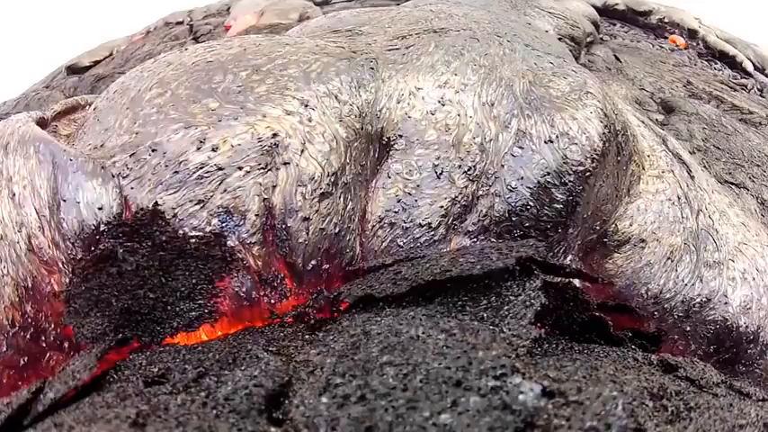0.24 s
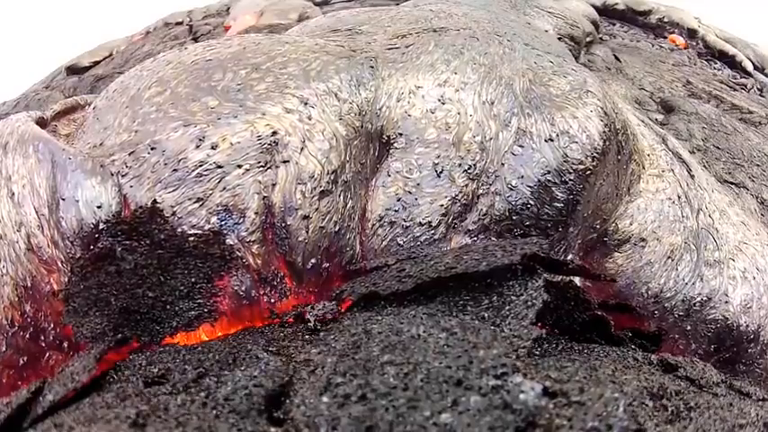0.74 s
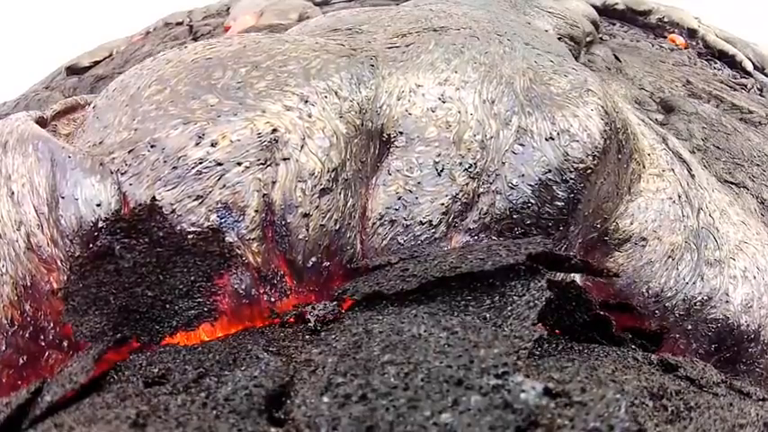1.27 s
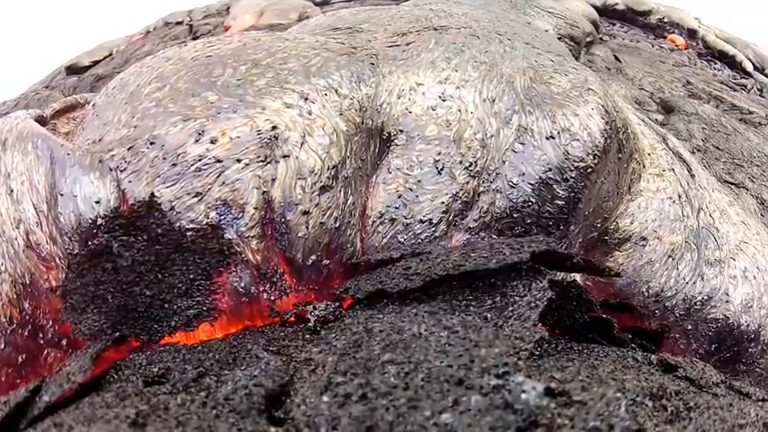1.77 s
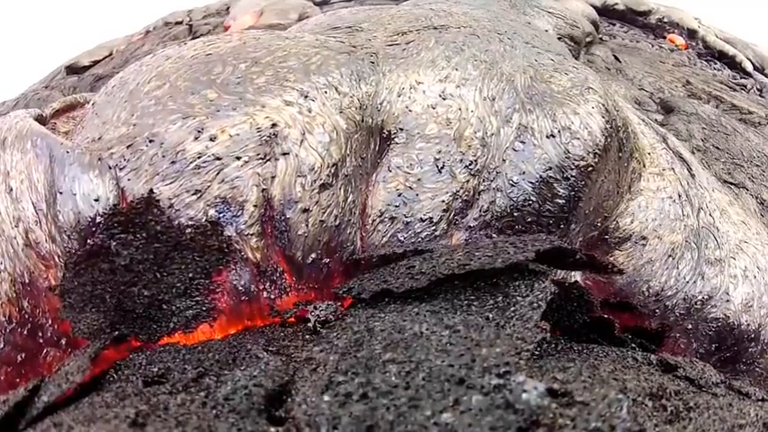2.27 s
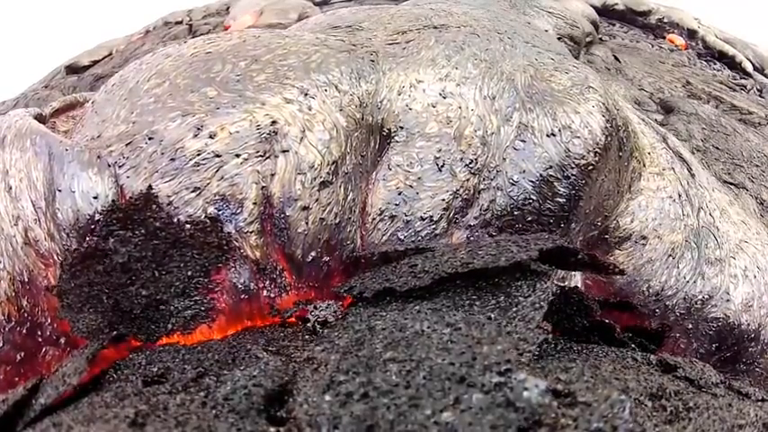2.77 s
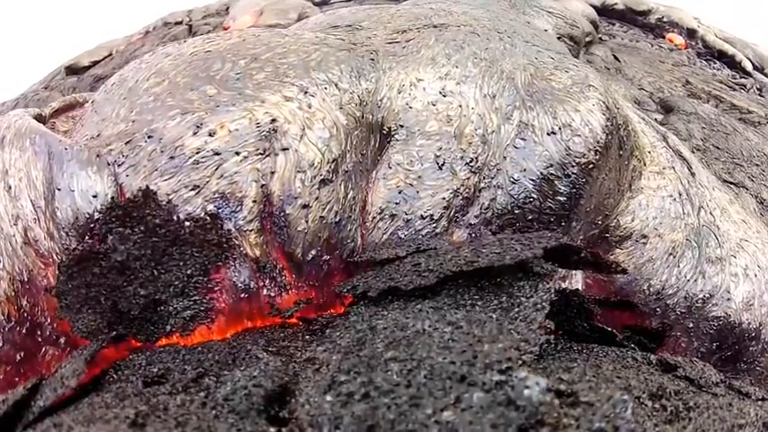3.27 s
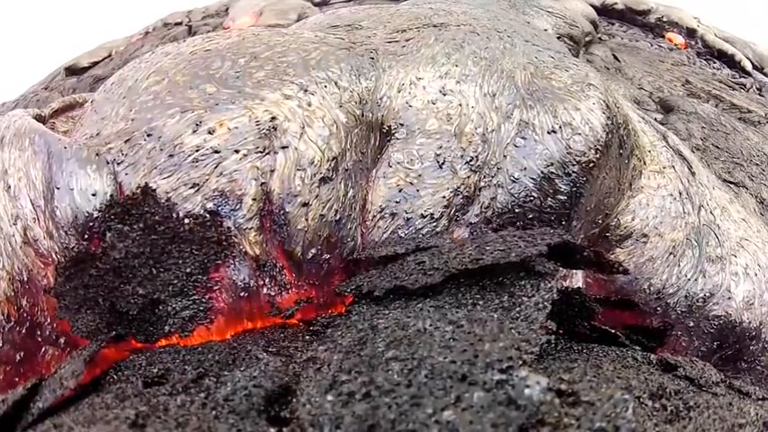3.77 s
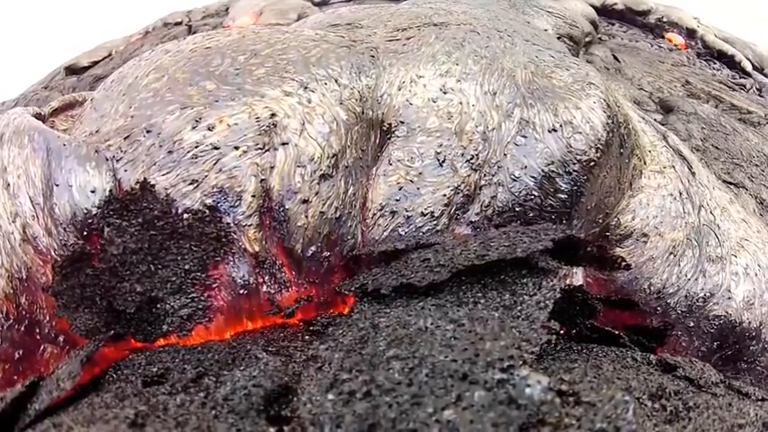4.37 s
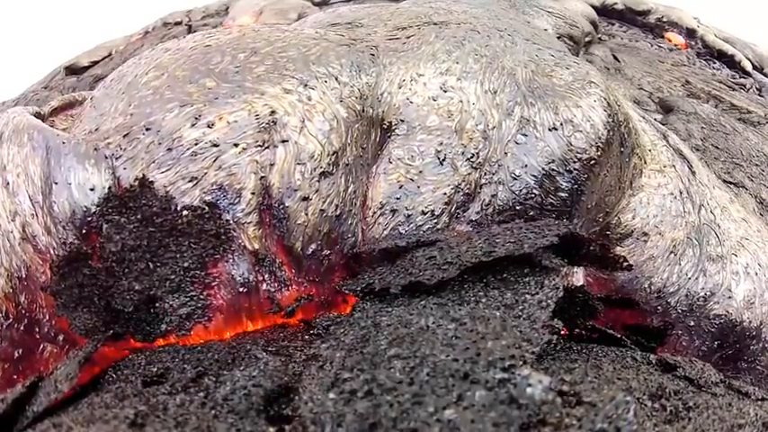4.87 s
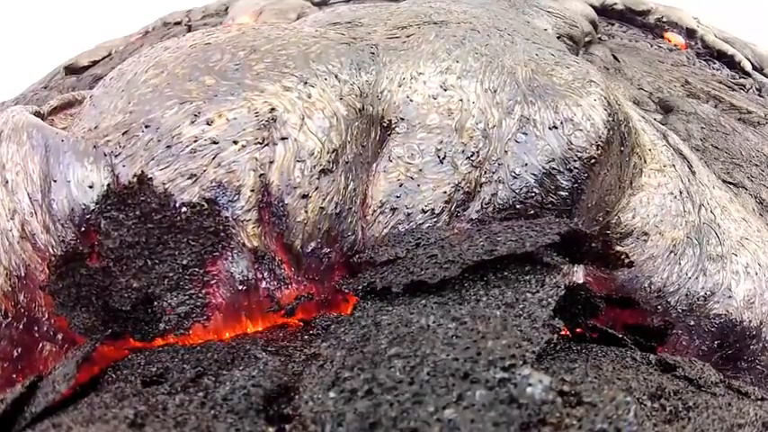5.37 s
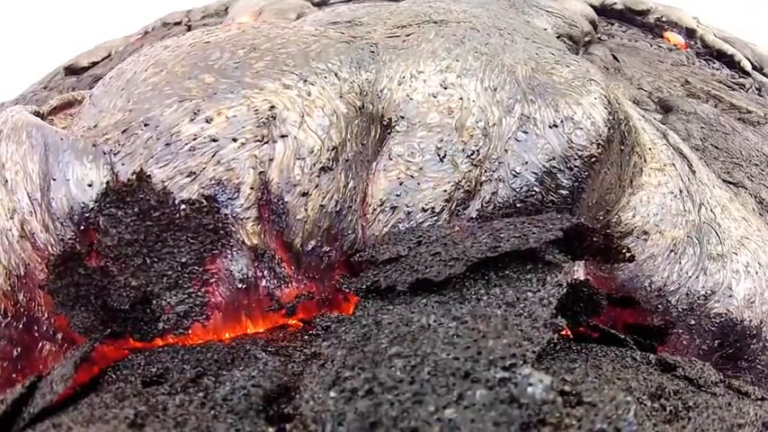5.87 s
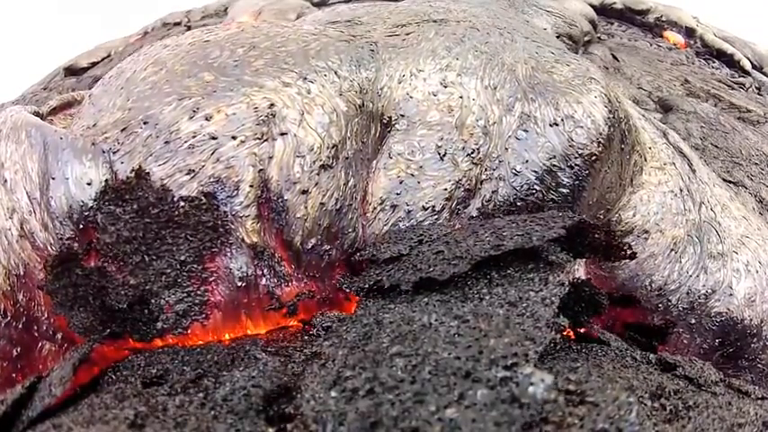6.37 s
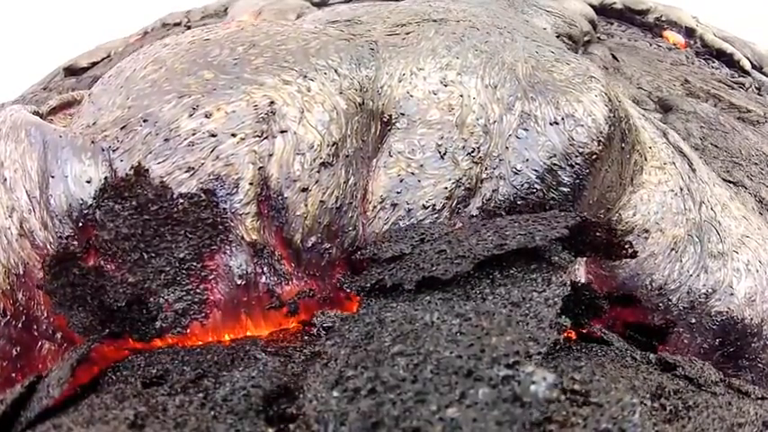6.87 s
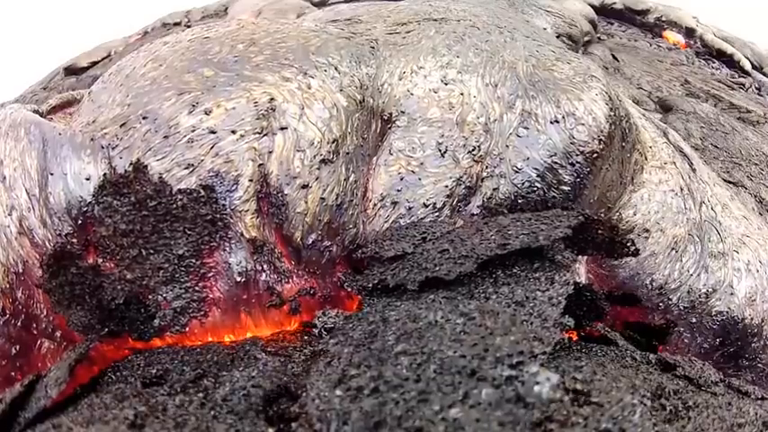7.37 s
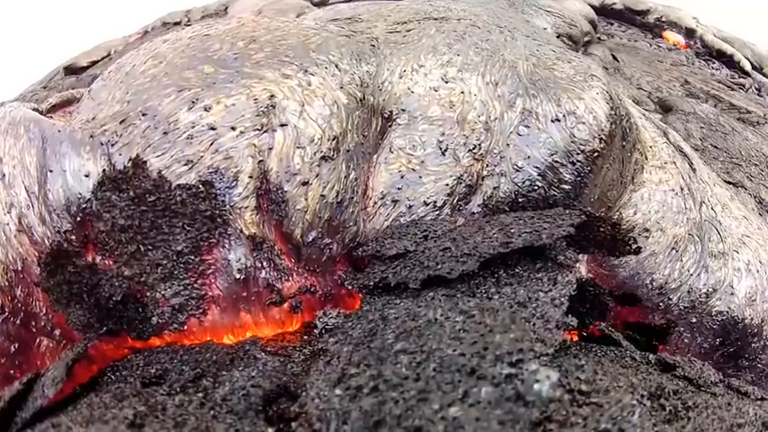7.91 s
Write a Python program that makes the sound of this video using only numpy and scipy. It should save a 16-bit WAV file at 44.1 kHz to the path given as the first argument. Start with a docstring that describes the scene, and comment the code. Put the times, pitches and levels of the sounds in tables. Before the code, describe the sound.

Close by in the open air, creeping lava breaks its cooling crust in small, uneven, hollow crunches. Glassy flakes tick off over a fine gritty crackle, and wind rumbles in swells on the microphone. A plate of crust snaps early, another cracks loudest near the middle, and two smaller snaps follow. Near the end the wind drops while the crunching goes on.

```python
"""A lobe of lava pushes against its cooling crust, close by in the open air. From the start the crust gives way
in small crunches and glassy flakes tick off, while wind rumbles in swells on the microphone. A plate snaps at
1.6 s, another, the loudest, at 3.5 s, and two more at 5.6 and 6.0 s. After 7 s the wind drops and the crunching
goes on. Throughout, each sample is held at a low rate, which mirrors the crackle into a gritty treble."""
import sys
import numpy as np
from scipy import signal
from scipy.fft import rfft, irfft, next_fast_len
from scipy.io import wavfile
from scipy.ndimage import uniform_filter1d

SR = 44100
rng = np.random.default_rng(int(sys.argv[2]) if len(sys.argv) > 2 else 0)


def dump(signal):
    """Clip the signal to [-1, 1] and save it as 16-bit WAV at the path in sys.argv[1]."""
    limited = np.clip(np.atleast_2d(signal).T, -1, 1)
    pcm = np.round(limited * 32767).astype(np.int16)
    wavfile.write(sys.argv[1], SR, pcm)


N = 358974
TIME = np.arange(N) / SR

# spectra of outdoor hush, wind rumble and recorder hiss: (frequency [Hz], relative density [dB])
AIR_SPECTRUM = [(30, -7), (100, 7.5), (230, 1), (400, 4), (800, 7), (1100, -14), (1600, -11.5), (2400, -10),
                (3400, -14.5), (4200, -15.5), (5000, -17.5), (6000, -25)]
RUMBLE_SPECTRUM = [(15, -19), (28, -2.5), (48, 1), (75, -1), (120, -5.5), (180, -10.5), (260, -19.5),
                   (400, -27), (800, -56.5), (2000, -63.5)]
HISS_SPECTRUM = [(30, 13.5), (100, -4.5), (250, 15.5), (420, 0.5), (750, -29), (1100, -12), (2000, -10),
                 (5000, 3.5), (7500, -5.5), (10000, -32), (16000, -57)]
# slow swell of the breeze: (time [s], relative level [dB])
BREEZE_SWELL = [(0.0, -46), (0.65, -56.5), (0.95, -47), (1.2, -47.5), (1.7, -44), (1.92, -51.5),
                (2.55, -49), (2.95, -53), (3.2, -50.5), (3.7, -53.5), (4.1, -52.5), (4.3, -45.5),
                (4.65, -50.5), (5.45, -48.5), (5.74, -42), (5.97, -49), (6.6, -48.5), (7.35, -58),
                (8.14, -56.5)]
# single buffets on the microphone: (time of peak [s], relative level [dB])
WIND_BUFFETS = [(0.16, -44.5), (1.27, -40.5), (1.48, -42), (1.8, -39.5), (2.049, -38.5), (2.35, -40),
                (2.71, -45.5), (3.17, -47), (4.43, -40.5), (4.96, -41.5), (5.79, -40.5), (6.11, -43.5),
                (6.22, -45.5), (6.5, -44)]
# fine crackle of the creeping crust: (time [s], level [dB])
CREEP_LEVEL = [(0.0, -52), (0.88, -54), (1.81, -52), (2.97, -56), (3.22, -53), (4.65, -57.5), (5.46, -52.5),
               (5.94, -55.5), (7.75, -52), (8.14, -56.5)]
# modes of flakes, hollow slab and brittle edges: (frequency [Hz], bandwidth [Hz], relative gain [dB])
FLAKE_RESONANCES = [(2510, 1020, -8), (4000, 1210, -7)]
BODY_RESONANCES = [(262.4, 150, -3.5), (506.5, 112, -0.5), (627.7, 122, -1), (777, 133, 0.5),
                   (873, 89, -4.5)]
EDGE_RESONANCES = [(1323, 132, 1), (1788, 123, 0.2), (2136, 243, 0.5), (2282, 114, -3), (2676, 210, -3.5),
                   (3020, 270, -3.5), (3973, 320, -5.5)]
# the louder flakes springing off: (time [s], relative level [dB])
FLAKE_TICKS = [(0.0183, -57), (0.2874, -60), (0.7793, -53), (0.8912, -57.5), (1.1771, -59.5), (1.5724, -65),
               (1.638, -54.5), (2.3975, -62), (2.4727, -51.5), (3.0589, -59), (3.1211, -58), (3.2282, -50),
               (3.3688, -57.5), (3.556, -61), (3.5684, -61), (3.933, -55.5), (3.97, -63), (4.0078, -61.5),
               (4.252, -55.5), (5.2165, -54.5), (5.8368, -56), (5.878, -57), (6.5583, -64), (6.9503, -63),
               (7.8375, -57.5)]
# plates breaking: (time [s], thump level before low-pass [dB], thump frequency [Hz],
# crack level [dB], crack frequency [Hz], click level [dB])
PLATE_SNAPS = [(1.6245, -32.5, 393, -30.5, 1540, -47), (3.5456, -12, 388, -13.5, 1960, -10),
               (5.5620, -38, 500, -30.5, 2330, -38.5), (6.0080, -24, 304, -45, 2100, -66)]
# the louder crunches: (time [s], nominal length [s], body level [dB], body pitch [Hz],
# edge level [dB], edge pitch [Hz])
LOUD_CRUNCHES = [(0.014, 0.019, -46, 745, -50.5, 2030), (0.202, 0.0072, -38, 880, -51, 2100),
                 (0.245, 0.016, -43, 660, -55, 1390), (0.356, 0.0027, -36.5, 660, -39.5, 2130),
                 (0.518, 0.016, -42, 754, -57, 1600), (0.608, 0.0066, -45.5, 726, -54, 2300),
                 (0.744, 0.014, -40, 834, -54.5, 2240), (0.846, .018, -43.5, 790, -54, 1900),
                 (1.02, 0.0069, -53, 715, -54.5, 1590), (1.101, 0.0064, -46, 670, -60, 1590),
                 (1.336, 0.0069, -44.5, 810, -52.5, 2100), (1.367, .012, -46, 760, -64, 2000),
                 (1.456, 0.0062, -42.5, 804, -45.5, 1890), (1.574, 0.0099, -43, 760, -57, 1700),
                 (1.638, .005, -45, 790, -50.5, 1790), (1.743, 0.0023, -39.5, 546, -65, 1800),
                 (1.823, 0.069, -50, 640, -56.5, 2200), (1.916, .005, -43.5, 774, -56, 1800),
                 (2.129, 0.0013, -39, 680, -50.5, 1690), (2.18, 0.016, -46.5, 780, -50, 2130),
                 (2.245, 0.013, -36, 695, -47, 2160), (2.292, 0.01, -38, 756, -54, 2100),
                 (2.456, 0.01, -46.5, 706, -55, 2700), (2.705, 0.0025, -38.5, 790, -58, 2000),
                 (2.799, 0.0069, -41.5, 780, -48, 1400), (3.018, 0.048, -46, 770, -55, 2520),
                 (3.36, 0.022, -45.5, 700, -55, 1810), (3.393, 0.0057, -41, 570, -53, 2000),
                 (3.747, 0.0079, -46.5, 770, -56, 2800), (3.841, 0.016, -46.5, 760, -61, 1500),
                 (3.908, 0.0071, -42.5, 810, -40.5, 2760), (4.183, 0.02, -47.5, 640, -57.5, 2100),
                 (4.574, 0.0049, -45, 676, -51.5, 2150), (4.831, .011, -48, 730, -64, 1700),
                 (5.255, .02, -46.5, 680, -63, 1800), (5.402, 0.007, -48, 770, -72, 2300),
                 (5.861, 0.019, -36, 675, -47, 1680), (6.058, 0.005, -41.5, 760, -66, 1500),
                 (6.076, .022, -44.5, 567, -61, 2200), (6.212, .01, -47.5, 700, -53, 2320),
                 (6.269, 0.0098, -41, 660, -53, 2570), (6.339, 0.026, -45.5, 537, -53, 2090),
                 (6.4, 0.0035, -43, 746, -63, 2200), (6.608, .011, -48, 730, -50.5, 3260),
                 (6.723, 0.0025, -45.5, 610, -52, 1900), (6.76, 0.021, -41.5, 790, -56, 2200),
                 (7.116, .003, -36, 715, -53, 1700), (7.15, 0.012, -47, 770, -49, 2800),
                 (7.193, 0.0054, -40.5, 680, -46.5, 1770), (7.284, .005, -42, 800, -57, 1500),
                 (7.313, .003, -44, 820, -51, 1800), (7.33, .011, -45, 650, -58, 2000),
                 (7.467, 0.013, -41, 604, -54, 1970), (7.624, 0.016, -44, 505, -62, 2200),
                 (7.745, 0.032, -42.5, 540, -57.5, 2100), (7.981, 0.003, -38, 746, -50, 3400),
                 (8.047, 0.022, -39.5, 720, -50.5, 1990)]


def from_db(db):
    """Amplitude grows tenfold for every 20 dB."""
    return 10 ** (np.asarray(db) / 20)


def unit_rms(x):
    """Normalisation to rms 1."""
    return x / np.sqrt(np.mean(x ** 2) + 1e-20)


def unit_peak(x):
    """Normalisation to peak 1."""
    return x / (np.abs(x).max() + 1e-20)


def unit_burst(x):
    """Normalisation to rms 1 over the loudest 10 ms."""
    return x / np.sqrt(uniform_filter1d(x ** 2, 440).max() + 1e-20)


def curve(rows, times=TIME):
    """Linear interpolation between (time, value) rows."""
    return np.interp(times, *np.transpose(rows))


def drift(per_s):
    """Random modulation: straight lines join per_s standard normal values a second."""
    return np.interp(TIME * per_s, np.arange(4000), rng.standard_normal(4000))


def noise(spectrum):
    """Spectral shaping colours white noise; the result has rms 1."""
    hz, db = np.transpose(spectrum)
    size = next_fast_len(N, real=True)
    bin_hz = np.arange(size // 2 + 1) * SR / size
    gain = from_db(np.interp(np.log(bin_hz + 1e-3), np.log(hz), db))
    return unit_rms(irfft(rfft(rng.standard_normal(size)) * gain, size)[:N])


def add(out, start_s, sound):
    """Superposition: a sound adds to the mix from start_s on."""
    at = int(np.clip(round(start_s * SR), 0, N - 1))
    out[at:at + len(sound)] += sound[:N - at]


def resonate(x, hz, width_hz):
    """A resonator passes a steep-sided band around its natural frequency."""
    low = np.hypot(hz, width_hz / 2) - width_hz / 2
    band = [low, min(low + width_hz, SR / 2 - 1)]
    return signal.sosfilt(signal.butter(2, band, "band", fs=SR, output="sos"), x + 1e-18)


def pop(hz, width_hz):
    """Impulse response of one resonance, with peak 1."""
    return unit_peak(resonate(signal.unit_impulse(1500), hz, width_hz))


def strike(clicks, modes, vary_db, weight=lambda hz: 1):
    """Modal excitation: every click drives each mode with a random strength of its own."""
    out, hit = 0, clicks != 0
    for hz, width_hz, db in modes:
        force = clicks * weight(hz)
        force[hit] *= from_db(db + vary_db * rng.standard_normal(hit.sum()))
        out = out + resonate(force, hz, width_hz)
    return out


def outdoor_hush(level_db=-58):
    """Stationary noise forms the ambient floor of the open air."""
    return from_db(level_db) * noise(AIR_SPECTRUM)


def wind(gain_db=1.08, calm_db=-58, flutter_db=1.9, buffet_s=0.029):
    """Turbulence rumbles on the microphone; the fluttering breeze and brief buffets add in power."""
    eddies = noise(RUMBLE_SPECTRUM)
    even_rumble = eddies / np.sqrt(uniform_filter1d(eddies ** 2, 5000))
    power = from_db(curve(BREEZE_SWELL) + flutter_db * drift(per_s=14)) ** 2
    for peak_s, db in WIND_BUFFETS:
        power += from_db(db) ** 2 * np.exp(-((TIME - peak_s) / buffet_s) ** 2)
    gust = from_db(gain_db) * np.sqrt(power)
    calm_fade = gust ** 2 / (gust ** 2 + from_db(calm_db) ** 2)   # in a calm the eddies die out
    return gust * even_rumble * calm_fade


def frying_skin(level_db=-72, per_s=240, size_db=7):
    """Shot noise: specks of glassy skin spring off the cooling lobe at independent instants."""
    released = rng.random(N) < per_s / SR
    size = np.minimum(rng.exponential(1, N), 3)
    clicks = released * rng.choice([-1, 1], N) * from_db(size_db * size)
    return from_db(level_db) * unit_rms(strike(clicks, FLAKE_RESONANCES, vary_db=1.5))


def creep_crackle(per_s=900, clump_db=5.5, size_db=5.0, body_db=-0.13, edge_db=-11):
    """Acoustic emission: tiny fractures come in clumps and excite the modes of the creeping crust."""
    fractures = rng.random(N) < per_s / SR
    clumping_db = clump_db * np.minimum(drift(per_s=85), 1)
    polarity = rng.choice([-1, 1], N)
    size = np.minimum(rng.exponential(1, N), 2)
    clicks = fractures * polarity * from_db(size_db * size + clumping_db)
    body = from_db(body_db) * unit_rms(strike(clicks, BODY_RESONANCES, vary_db=3.5))
    edge = from_db(edge_db) * unit_rms(strike(clicks, EDGE_RESONANCES, vary_db=3.0))
    return from_db(curve(CREEP_LEVEL)) * (body + edge)


def flake_ticks(gain_db=17.0, pitch_spread=0.14):
    """Damped free vibration: each thin flake rings for about a millisecond at a pitch of its own."""
    out = np.zeros(N)
    tunings = np.exp(pitch_spread * rng.standard_normal(len(FLAKE_TICKS)))
    for (start_s, db), tuning in zip(FLAKE_TICKS, tunings):
        flake = sum(from_db(mode_db) * pop(hz * tuning, width) for hz, width, mode_db in FLAKE_RESONANCES)
        add(out, start_s, from_db(db + gain_db) * unit_peak(flake))
    return out


def slip_runs(lengths_s, per_s, first_slip, samples=3600):
    """Power-law relaxation: a first fracture sets off a dying run of small slips, one row per length."""
    shape = (len(lengths_s), samples)
    age_s = np.arange(samples) / SR
    slips = rng.standard_normal(shape) * (rng.random(shape) < per_s / SR)
    slips[:, 0] = first_slip
    return slips / (1 + (age_s / np.maximum(lengths_s, .001)[:, None]) ** 2) ** 2


def plate_snaps(splinter_db=-16, grit_db=-20, grit_s=0.011):
    """Impulsive radiation: a breaking plate shoves the air, with a crack and glassy click; grit follows."""
    out = np.zeros(N)
    click = pop(hz=4150, width_hz=720) + from_db(splinter_db) * pop(hz=5500, width_hz=800)
    lowpass = signal.butter(2, 950, fs=SR, output="sos")
    slips = slip_runs(np.full(len(PLATE_SNAPS), grit_s), per_s=3400, first_slip=1)
    grits = strike(slips, FLAKE_RESONANCES[:1], vary_db=0)
    for (start_s, thump_db, thump_hz, crack_db, crack_hz, click_db), grit in zip(PLATE_SNAPS, grits):
        thump = from_db(thump_db) * signal.sosfilt(lowpass, pop(thump_hz, width_hz=1.29 * thump_hz))
        crack = from_db(crack_db) * pop(crack_hz, width_hz=950)
        add(out, start_s, from_db(click_db) * click - thump - crack)
        add(out, start_s, from_db(crack_db + grit_db) * unit_peak(grit))
    return out


def small_crunches(per_s=8.5, vary_db=2.5, count=120):
    """Strain builds and releases at uneven intervals, louder with creep; rows are as in LOUD_CRUNCHES."""
    scatter = rng.standard_normal((count, 5))
    start_s = np.cumsum(rng.gamma(3, 1 / 3, count)) / per_s
    start_s = start_s[start_s < TIME[-1]]
    length_dev, body_dev, body_pitch_dev, edge_dev, edge_pitch_dev = scatter[:len(start_s)].T
    creep_db = curve(CREEP_LEVEL, start_s)
    length_s = 0.0054 * np.exp(0.34 * length_dev)
    body_db = creep_db + 3.5 + vary_db * body_dev
    body_hz = 720 * np.exp(0.1 * body_pitch_dev)
    edge_db = creep_db - 7 + vary_db * edge_dev
    edge_hz = 2430 * np.exp(0.34 * edge_pitch_dev)
    return np.column_stack([start_s, length_s, body_db, body_hz, edge_db, edge_hz])


def ring_crust(starts_s, slips, modes, levels_db, pitches_hz, db_per_octave=12.5):
    """Selective excitation: a crunch drives a mode less the farther it lies from the crunch's pitch."""
    rings = strike(slips, modes, vary_db=5.0,
                   weight=lambda hz: from_db(-db_per_octave * np.abs(np.log2(hz / pitches_hz)))[:, None])
    out = np.zeros(N)
    for start_s, db, ring in zip(starts_s, levels_db, rings):
        add(out, start_s, from_db(db) * unit_burst(ring))
    return out


def crust_crunches(body_stretch=1.62, edge_stretch=1.28, body_lead_s=0.00138, edge_lead_s=0.00026):
    """Brittle fracture excites resonance: as the crust gives way, its slab rings hollow, its edges bright."""
    start_s, length_s, body_db, body_hz, edge_db, edge_hz = np.vstack([LOUD_CRUNCHES, small_crunches()]).T
    body_slips = slip_runs(length_s * body_stretch, per_s=1000, first_slip=2.26)
    edge_slips = slip_runs(length_s * edge_stretch, per_s=1000, first_slip=2.94)
    # narrow resonances build slowly, so their slips lead a little
    body = ring_crust(start_s - body_lead_s, body_slips, BODY_RESONANCES, body_db, body_hz)
    edge = ring_crust(start_s - edge_lead_s, edge_slips, EDGE_RESONANCES, edge_db, edge_hz)
    return body + edge


def scene():
    """Superposition of lava, wind and outdoor hush, alike in both channels."""
    lava = crust_crunches() + creep_crackle() + flake_ticks() + frying_skin() + plate_snaps()
    mono = lava + wind() + outdoor_hush()
    return np.array([mono, mono])


def record(dry, hold_hz=12000, cutoff_hz=15200, hiss_db=-79):
    """A zero-order hold mirrors the spectrum around the hold rate; each channel adds a faint hiss."""
    coarse = signal.resample_poly(dry, hold_hz, SR, axis=1)
    staircase = np.repeat(coarse, 4, axis=1)
    held = signal.resample_poly(staircase, SR, 4 * hold_hz, axis=1)[:, :N]
    hiss = from_db(hiss_db) * np.array([noise(HISS_SPECTRUM), noise(HISS_SPECTRUM)])
    lowpass = signal.ellip(10, .1, 80, cutoff_hz, fs=SR, output="sos")
    return signal.sosfilt(lowpass, held + hiss)


dry = scene()
out = record(dry)
dump(out)
```